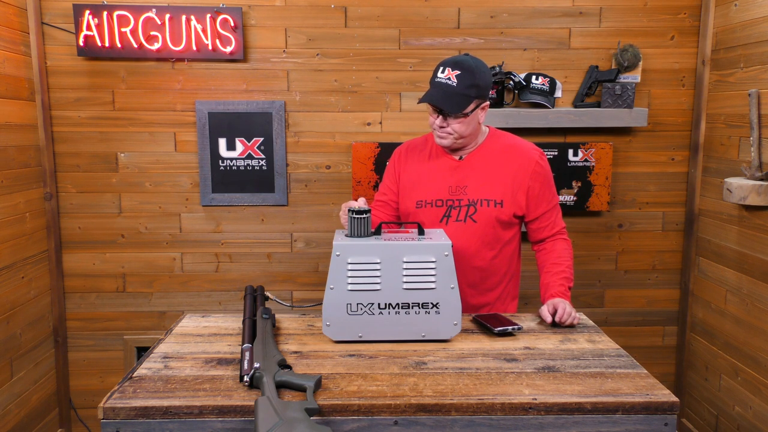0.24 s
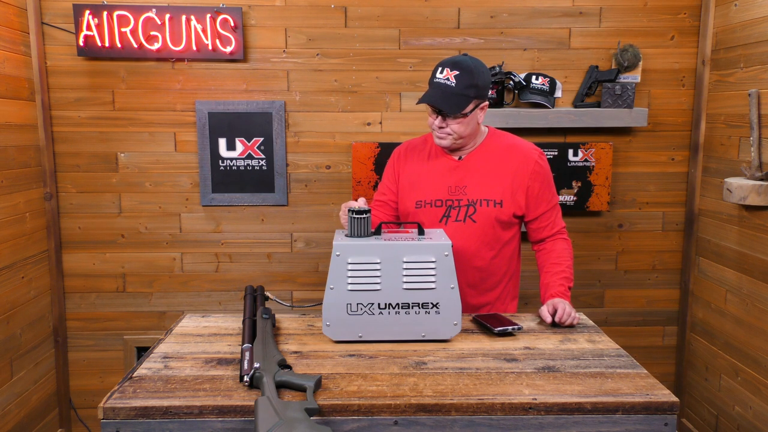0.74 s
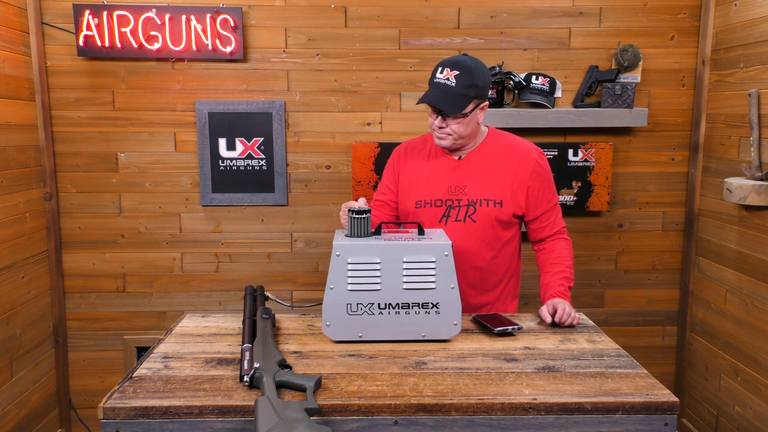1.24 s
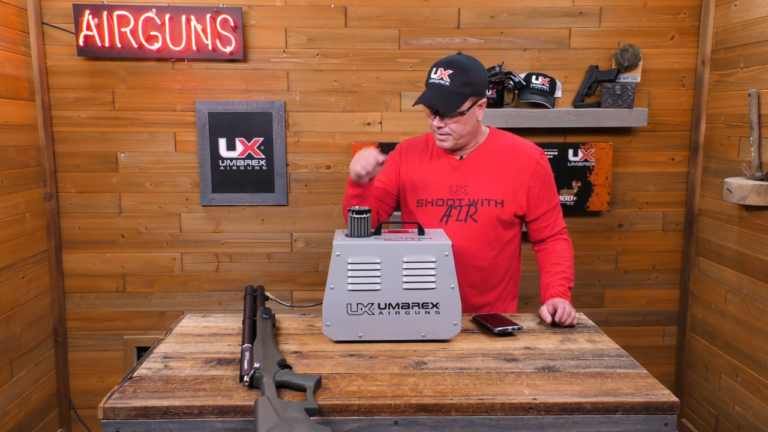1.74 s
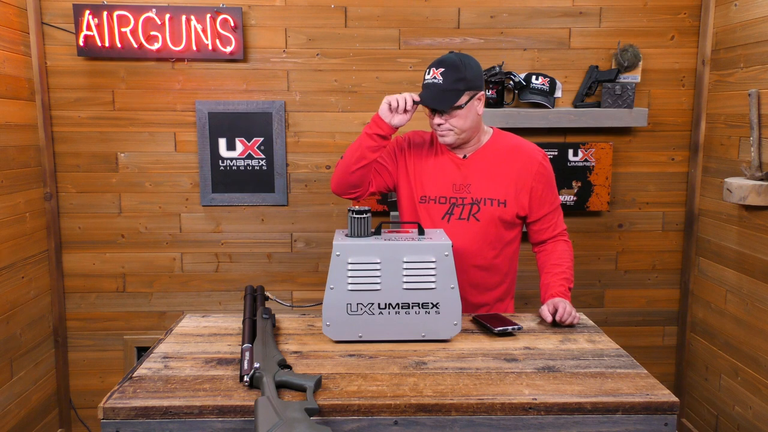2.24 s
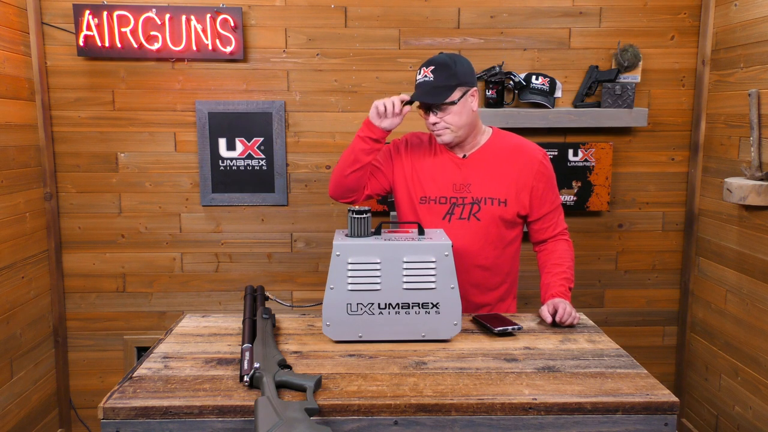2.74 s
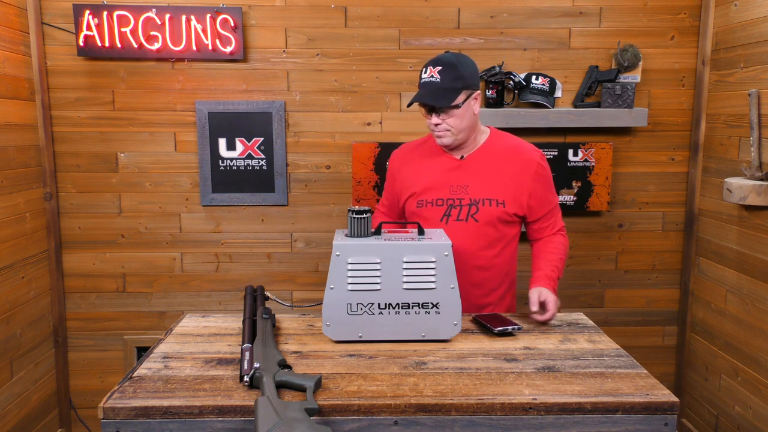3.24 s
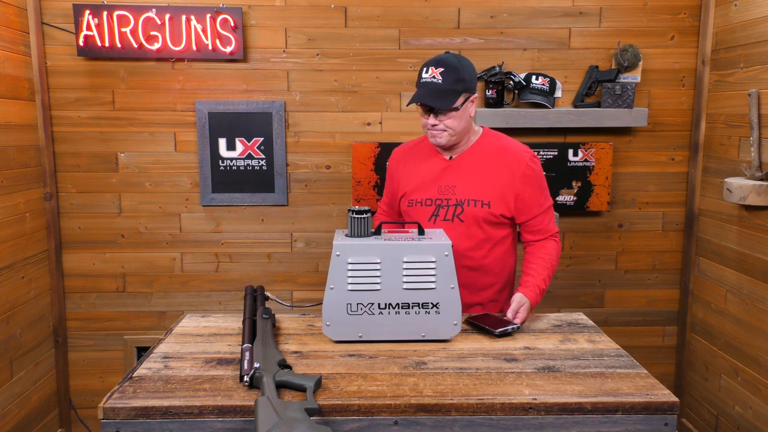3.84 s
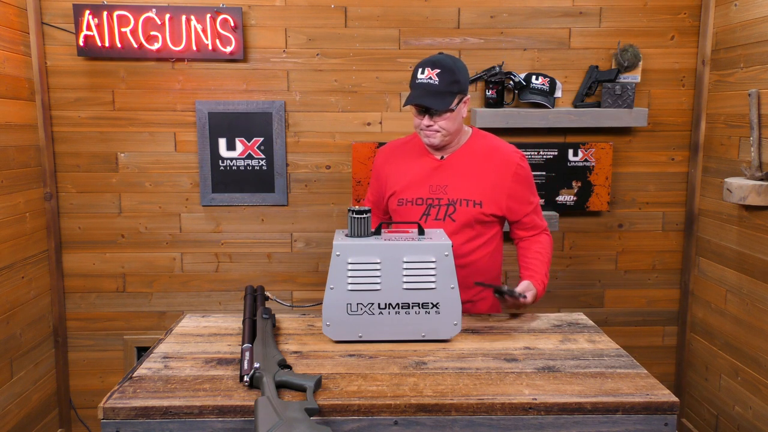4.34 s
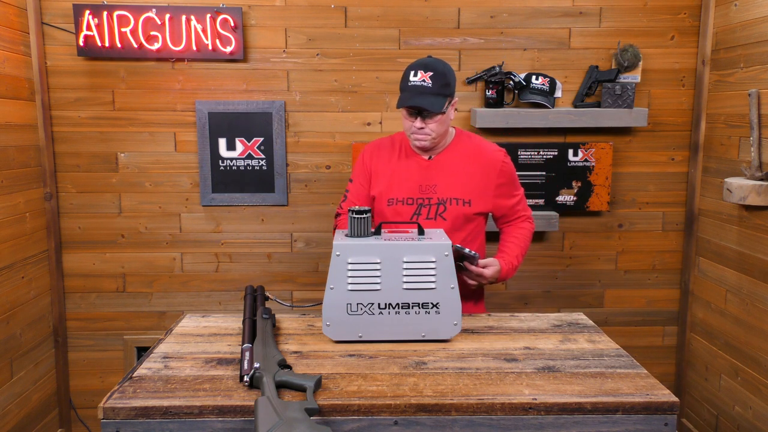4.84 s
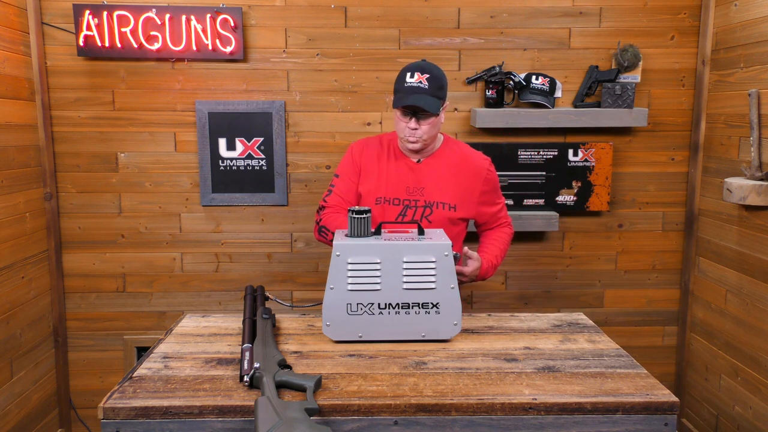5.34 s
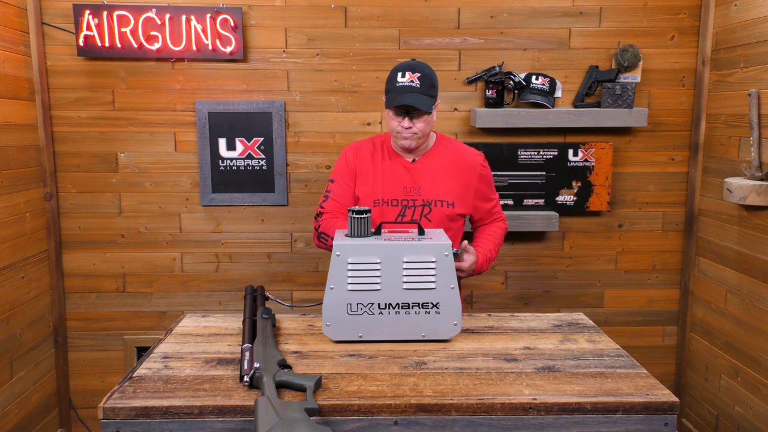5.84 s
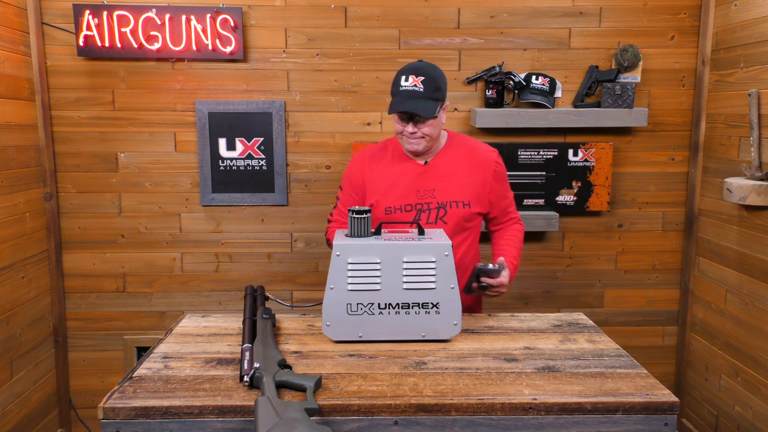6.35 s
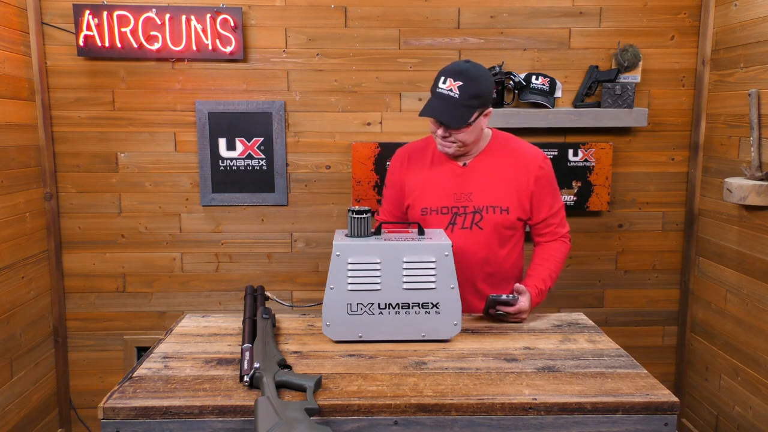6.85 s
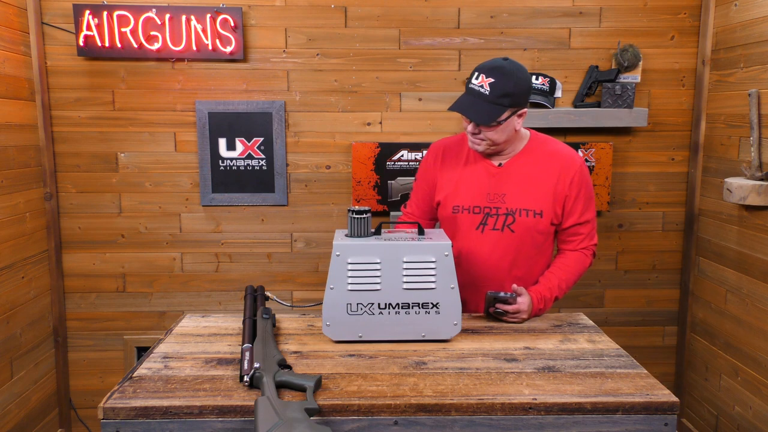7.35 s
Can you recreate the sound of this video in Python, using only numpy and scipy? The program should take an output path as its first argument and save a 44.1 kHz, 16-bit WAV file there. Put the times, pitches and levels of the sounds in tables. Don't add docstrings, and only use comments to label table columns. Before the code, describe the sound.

A small air compressor in a sheet-metal case is already running on a wooden table in a small room. Its nasal gear whine throbs nearly eight times a second, each stroke carrying a rattle, a boxy panel knock and hissy metallic chatter. It slows very slightly and grows a little harsher as pressure builds. Faint cooling air sits underneath. The microphone is near and dry, with a little room reflection.

```python
import sys
import numpy as np
from scipy import signal
from scipy.fft import rfft, irfft, next_fast_len
from scipy.io import wavfile
from scipy.ndimage import map_coordinates

SR = 44100
rng = np.random.default_rng(int(sys.argv[2]) if len(sys.argv) > 2 else 0)


def dump_mix(stems):
    frames = np.atleast_2d(stems).T
    limited = np.clip(frames, -1, 1)
    pcm = np.round(limited * 32767).astype(np.int16)
    wavfile.write(sys.argv[1], SR, pcm)


def nominal_scale(level):
    x = np.asarray(level, float) / 20
    return 10 ** x


N = 334719

START_TURN, START_SPEED, SLOWING, EASING = -0.78399, 7.739856, 0.05108927, 0.004117527
FULL_LOAD = 0.63

# [t/s, pressure/0 to 1]
TANK_PRESSURE = [(0, 0.29), (1.2, 0.27), (3.2, 0.54), (5, .8), (6.8, 1)]
# [t/s, presence/0 to 1]
PERSON_BEHIND = [(4.65, 0), (5.1, 0.33), (6.15, 0.67), (6.451, 0.32)]
# [t/s, presence/0 to 1]
PERSON_ASIDE = [(6.15, 0.09), (6.45, 0.87)]
# [t/s, presence/0 to 1]
ARM_OVER_CASE = [(1.6, 0), (2, 1), (2.9, 1), (3.4, 0.2)]
# [t/s, firmness/-1 to 1]
SEATING = [(0, 0.91), (.7, 0.75), (2.1, -0.52), (4.2, -0.08), (5.4, -0.17), (6.5, 0.87), (7.6, 1)]
# [t/s, level/dB]
WHINE_LEVEL = [(0, -2), (.7, -.5), (1.4, -0.5), (2.1, 0.85), (2.8, 0.5), (3.5, .5), (4.3, 1.3), (5, 0.5),
               (5.6, 0), (6.1, 1.5), (6.6, 1), (7, .5), (7.6, -1.5)]

TEETH = [(0, 86.7), (.07, 87.2), (.2, 87.7), (.33, 87.7), (.48, 87.3), (.65, 87.9), (.79, 90), (.885, 88.8),
         (.94, 87.3)]
PITCH_DRAG = [(.03, -1.4), (.15, 0), (.25, .3), (.4, -.7), (.56, -1.4), (.68, 0), (.8, .2), (.89, -0.099),
              (.98, -1.8)]
# [angle/turn, hold/turn, rise/dB per turn, sag/dB per turn, fall/dB per turn]
PHASES_EMPTY = [
    (0.47, 0.11, 140, 5, 146),
    (0.19, 0.29, 160, 39.4, 300),
    (0.86, 0.035, 65, 1, 300),
    (0.936, 0.0475, 210, 28, 350),
    (0.059, 0.032, 130, 1, 250),
]
PHASES_FULL = [
    (0.59, 0.11, 390, 5, 150),
    (0.22, 0.24, 290, 9.9, 220),
    (0.826, 0.058, 125, 1, 440),
    (0.935, 0.044, 170, 32, 180),
    (0.093, 0.016, 630, 1, 360),
]
# [coast/dB, intake/dB, squeeze/dB, top/dB, reversal/dB]
MESH_EMPTY = [(-49, -32, -38, -39, -25), (-37, -18, -24.5, -14, -33), (-46, -28, -39, -30.5, -42),
              (-52, -35.5, -63, -32, -41)]
MESH_LOADED = [(-35.5, -29, -36.5, -33.5, -34), (-41, -17.5, -21.5, -16.5, -24),
               (-44.5, -31.5, -31, -36, -41), (-55.5, -39.5, -58, -41, -44)]
# [intake/dB, squeeze/dB, top/dB]
MESH_BEHIND = [(-1.5, -17, 4), (-15.5, -15, -6.5), (5.5, 9, 10), (-8, 4, -6)]
MESH_ASIDE = [(-12, -11, -5.5), (4, 2, 2.5), (-5, 1.5, -2), (-1, 9.5, -8)]
INTAKE_LAG = [(0.11, 0.52), (0, 1), (0.063, 0.87), (0.11, 0.41)]
ORDER_TRIM = [-1.94, 0.3, -2.4, -0.64]
# [order, intake/dB, squeeze/dB at low pressure, intake/dB, squeeze/dB at high pressure]
UPPER_ORDERS = [(5, -54.5, -55.5, -55.5, -52.5), (6, -59, -65, -61, -55), (7, -67.5, -56.5, -67, -67.5),
                (8, -68, -65, -61.5, -67), (9, -70, -66, -63, -59), (10, -65, -62, -65, -62),
                (11, -91, -78, -66, -68), (12, -68, -65, -74, -86), (13, -64, -72, -61, -68),
                (14, -55.5, -64, -66, -74), (15, -61, -56, -69, -79), (16, -58, -58.5, -70, -62),
                (17, -69, -56.5, -76.0, -63), (18, -58, -64.0, -63, -73), (19, -82, -71.0, -73.0, -68)]
SQUEEZING = [(.05, 1), (.15, 0), (.55, 0), (.65, 1)]

# [angle/turn, level/dB, hold/turn, rise/dB per turn, fall/dB per turn]
MID_CHATTER = [(.12, -49, 0.33, 27, 45), (.96, -47, 0.017, 76, 100)]
HIGH_CHATTER = [(.2, -46.5, 0.057, 79, 30), (.77, -45.5, 0.0072, 90, 50.6), (.97, -49, 0.087, 40.2, 70)]
BOOM_BURSTS = [(0.15, -30, 0.011, 280, 310), (0.276, -26.5, 0.022, 180, 114), (0.016, -32, .02, 300, 330),
               (0.51, -23, 0.018, 110, 140)]
RATTLE_BURSTS = [
    (0.018, -30.5, 0.056, 530, 49.5),
    (.62, -47, 0.021, 59, 65),
]
# [f/Hz, level/dB per Hz]
CHATTER_COLOUR = [(2400, -4), (3000, -10), (4500, -13.5), (6200, -9.5), (7700, -12.5), (10500, -9),
                  (12500, -15), (15600, -37)]
# [f/Hz, width/Hz, level/dB]
LARGEST_PANEL = [(406.8, 28.8, 2), (388.8, 48.4, -4.5)]
# [f/Hz, width/Hz, level/dB]
CASE_PANELS = [(458.4, 31.5, -3.5), (548.6, 16, -7.5), (659, 69, -4), (996, 93, -6), (1042, 69, -2),
               (1257, 45, -0.5), (1444, 63, -12), (1838, 119, -6.5), (2094, 143, -10), (2356, 50, -17),
               (3100, 180, -38.5)]
# [f/Hz, width/Hz, level/dB]
DRIFTING_PANELS = [(355.7, 13.8, -12), (792, 20.7, 0.5), (1552, 52, -0.5)]
# [per seating/dB, under the arm/dB, person behind/dB, person aside/dB]
PANEL_SHIFT = [(8.5, 1.5, 4.5, 2), (-6, -4.5, -1, 2), (0, -9.5, 6.5, -4)]
# [angle/turn, level on case/dB, level on largest panel/dB]
BLOWS = [(.005, 3, -4.5), (.05, -25, -3), (0.1, -18, -8.5), (0.27, -18, 2), (0.473, -8, -3),
         (0.681, -23, -5)]

# [order of crank, level/dB]
SHAFT_TONES = [(88 / 9, -63), (15, -66), (88 / 3, -70)]
# [f/Hz, level/dB per Hz]
FAN_COLOUR = [(20, 0.5), (60, -6), (130, -14), (200, -6.5), (280, -10.5), (500, -6.5), (1500, -5.5),
              (4000, -17.5), (9000, -25.5), (15000, -53)]
# [f/Hz, t/s]
ROOM_DECAY = [(200, 0.33), (2000, 0.96), (10000, 0.043)]


def unit(x):
    return x / np.sqrt(np.mean(x ** 2) + 1e-20)


def along(points, hz):
    f, v = np.transpose(points)
    return np.interp(np.log(hz + 1), np.log(f + 1), v)


def curve(rows):
    seconds, values = np.transpose(rows)
    return np.interp(np.arange(N) / SR, seconds, values)


def per_stroke(rows, turns):
    share, values = np.transpose(rows)
    return np.interp(turns, share, values, period=1)


def filtered(x, response):
    m = next_fast_len(N + SR // 2)
    return irfft(rfft(x, m) * response(np.fft.rfftfreq(m, 1 / SR)), m)[..., :N]


def resonances(modes):
    def response(f):
        total = 0
        for k, (centre, width, db) in enumerate(modes):
            damping = 1j * f * width
            total = total + (-1) ** k * nominal_scale(db) * damping / (centre ** 2 - f ** 2 + damping)
        return total
    return response


def worn(turns, count, renew, order):
    slow = (turns - turns[0]) / renew
    pattern = rng.standard_normal((int(slow[-1]) + 2, count + 4))
    row, mix = slow.astype(int), slow % 1 * np.pi / 2
    place = turns % 1 * count + 1
    now = map_coordinates(pattern, [row, place], order=order)
    later = map_coordinates(pattern, [row + 1, place], order=order)
    return np.cos(mix) * now + np.sin(mix) * later


def impacts(turns, fresh, spiky_db):
    size = nominal_scale(spiky_db * worn(turns, count=90, renew=18.5, order=1))
    same = worn(turns, count=5600, renew=10.18, order=0) * size
    return np.sqrt(1 - fresh) * unit(same) + np.sqrt(fresh) * rng.standard_normal(N)


def swell(turns, share, hold, rise_db, sag_db, fall_db):
    x = (turns - share + .5) % 1 - .5
    attack = -abs(rise_db) * np.maximum(-x, 0)
    sag = -abs(sag_db) * np.maximum(x, 0)
    return attack + sag - abs(fall_db) * np.maximum(x - hold, 0)


def stacked(idle_db, swells_db):
    return 10 * np.log10(nominal_scale(2 * idle_db) + sum(nominal_scale(2 * db) for db in swells_db))


def bursts(turns, rows, idle_db):
    flares = [db + swell(turns, share, hold, rise, 0, fall) for share, db, hold, rise, fall in rows]
    return stacked(idle_db, flares)


def crank_turns():
    t = np.arange(N) / SR
    return START_TURN + START_SPEED * t - SLOWING * t ** 2 / 2 + EASING * t ** 3 / 6


def tooth_load(turns):
    pressure, behind, aside = curve(TANK_PRESSURE), curve(PERSON_BEHIND), curve(PERSON_ASIDE)
    load = np.clip(pressure / FULL_LOAD, 0, 1)
    shapes = [[a + pressure * (b - a) for a, b in zip(*pair)] for pair in zip(PHASES_EMPTY, PHASES_FULL)]
    coast, intake, *compression = [swell(turns, *shape) for shape in shapes]
    share, hold, *slopes = shapes[1]
    orders_db = []
    for empty, loaded, back, side, (lag, steep) in zip(MESH_EMPTY, MESH_LOADED, MESH_BEHIND, MESH_ASIDE, INTAKE_LAG):
        peak_db = [a + load * (b - a) for a, b in zip(empty, loaded)]
        person_db = [0, *(behind * a + aside * b for a, b in zip(back, side)), 0]
        late_intake = swell(turns, share + lag, hold - lag * 1.32, *(steep * s for s in slopes))
        phases = [coast, late_intake, *compression]
        swells = [p + q + r for p, q, r in zip(peak_db, person_db, phases)]
        orders_db.append(stacked(peak_db[0] - 24, swells))
    engaged_db = 0.57 * stacked(-19, [intake, *compression[:2]])
    return orders_db, engaged_db


def mesh_phase(turns):
    teeth = per_stroke(TEETH, turns) + 0.15
    return 2 * np.pi * np.cumsum(teeth * np.gradient(turns)) + 0.066 * worn(turns, count=30, renew=5.53, order=3)


def gear_whine(turns, mesh, orders_db, level_db):
    drag = 2 * np.pi * np.cumsum((per_stroke(PITCH_DRAG, turns) + .3) * np.gradient(turns))
    whine = 0
    for order, (db, trim) in enumerate(zip(orders_db, ORDER_TRIM), start=1):
        second = order == 2
        follow_db = level_db if second else 0.39 * level_db
        uneven_db = 0.27 * worn(turns, count=40, renew=6.0, order=1)
        tone = np.sqrt(2) * np.sin(order * (mesh + drag * second))
        whine = whine + nominal_scale(db + trim + follow_db + uneven_db) * tone
    return whine


def upper_whine(mesh, turns, mid_db, high_db):
    squeezing, pressure = per_stroke(SQUEEZING, turns), curve(TANK_PRESSURE)
    total = 0
    for order, low_in, low_sq, high_in, high_sq in UPPER_ORDERS:
        intake_db = low_in + pressure * (high_in - low_in)
        squeeze_db = low_sq + pressure * (high_sq - low_sq)
        load_db = 0.78 * (52 + mid_db) if order < 12 else 1.15 * (50.0 + high_db)
        flare_db = 4.55 * worn(turns, count=12, renew=5.71, order=1)
        level = nominal_scale(intake_db + squeezing * (squeeze_db - intake_db) + load_db + flare_db)
        total = total + level * np.sqrt(2) * np.sin(order * mesh + rng.uniform(0, 2 * np.pi))
    return total


def chatter(turns, mid_db, high_db):
    def colour(hz):
        return nominal_scale(along(CHATTER_COLOUR, hz)) * (hz > 2300)

    def below(hz, edge, steep):
        return 1 / (1 + (hz / edge) ** steep)

    def above(hz, edge, steep):
        return 1 / (1 + (edge / (hz + 1)) ** steep)

    mid = nominal_scale(mid_db) * impacts(turns, fresh=.35, spiky_db=4)
    mid = filtered(mid, lambda hz: colour(hz) * below(hz, 7500, 8))
    high = nominal_scale(1.13 * (high_db + 50) - 49.0) * impacts(turns, fresh=0.25, spiky_db=0.5)
    high = filtered(high, lambda hz: colour(hz) * above(hz, 7500, 8) * below(hz, 12300, 12))
    top = nominal_scale(2.5 * (high_db + 49) - 50.5) * impacts(turns, fresh=.45, spiky_db=4)
    top = filtered(top, lambda hz: colour(hz) * above(hz, 12300, 12))
    return nominal_scale(16.5) * mid + nominal_scale(14) * high + nominal_scale(17.5) * top


def shaft_hum(turns):
    return sum(nominal_scale(db) * np.sqrt(2) * np.sin(2 * np.pi * order * turns) for order, db in SHAFT_TONES)


def blows(turns, column):
    x = np.zeros(N)
    for share, *db in BLOWS:
        at = np.flatnonzero(np.diff(np.floor(turns - share)) > 0)
        x[at] += nominal_scale(db[column] + 0.7 * rng.standard_normal(len(at)))
    return x


def panel_boom(turns, knock_db):
    burst_db = bursts(turns, BOOM_BURSTS, idle_db=-39)
    thump = nominal_scale(burst_db + 11) * impacts(turns, fresh=0.017, spiky_db=-1.0) + nominal_scale(18.0) * blows(turns, column=1)
    return nominal_scale(knock_db + 5.1 * curve(PERSON_BEHIND)) * filtered(thump, resonances(LARGEST_PANEL))


def panel_drift():
    controls = [curve(rows) for rows in (SEATING, ARM_OVER_CASE, PERSON_BEHIND, PERSON_ASIDE)]
    return [sum(db * c for db, c in zip(row, controls)) for row in PANEL_SHIFT]


def case_rattle(turns, knock_db):
    reversal_db, valve_db = (bursts(turns, [row], idle_db=-55.5) for row in RATTLE_BURSTS)
    rattle_db = stacked(reversal_db, [valve_db + 8.5 * curve(TANK_PRESSURE)])
    rattle_db = rattle_db + 2.5 * curve(PERSON_BEHIND) - 2.5 * curve(PERSON_ASIDE)
    knocks = nominal_scale(rattle_db + 22.5) * impacts(turns, fresh=0.085, spiky_db=0.26)
    shake = nominal_scale(knock_db) * (knocks + nominal_scale(12) * blows(turns, column=0))
    rattle = filtered(shake, resonances(CASE_PANELS))
    for db, mode in zip(panel_drift(), DRIFTING_PANELS):
        rattle += nominal_scale(db) * filtered(shake, resonances([mode]))
    return rattle


def radiated(x):
    return filtered(x, lambda hz: (1j * hz / (1j * hz + 325 / 0.96 + 325 ** 2 / (1j * hz + 1))) ** 2)


def compressor():
    turns, level_db = crank_turns(), curve(WHINE_LEVEL)
    knock_db, chatter_db = 0.39 * level_db, 0.22 * level_db
    mid_db = bursts(turns, MID_CHATTER, idle_db=-80) + 2 * curve(TANK_PRESSURE)
    high_db = bursts(turns, HIGH_CHATTER, idle_db=-61.5)
    orders_db, engaged_db = tooth_load(turns)
    mesh = mesh_phase(turns)
    whine = gear_whine(turns, mesh, orders_db, level_db)
    upper = nominal_scale(engaged_db + 2.5) * upper_whine(mesh, turns, mid_db, high_db)
    fine = nominal_scale(chatter_db) * (upper + chatter(turns, mid_db, high_db))
    case = radiated(panel_boom(turns, knock_db) + case_rattle(turns, knock_db))
    return whine + fine + shaft_hum(turns) + case


def fan():
    return nominal_scale(-49.0) * unit(filtered(rng.standard_normal(N), lambda hz: nominal_scale(along(FAN_COLOUR, hz))))


def room(x):
    hz, t, z = signal.stft(rng.standard_normal(SR // 2), SR, nperseg=256)
    fade = nominal_scale(-60 * t / along(ROOM_DECAY, hz)[:, None])
    tail = signal.istft(z * fade, SR, nperseg=256)[1]
    delayed = np.pad(x, (400, 0))
    return signal.fftconvolve(delayed, tail / np.linalg.norm(tail))[:N]


def scene():
    machine = compressor()
    return (machine + nominal_scale(-22.5) * room(machine) + fan())[None]


def low_pass(x):
    return signal.sosfilt(signal.butter(12, 15710, fs=SR, output="sos"), x)


def record(dry):
    bend = dry ** 2 - np.mean(dry ** 2)
    throb = filtered(bend, lambda hz: 1j * hz / (15 + 1j * hz) / (1 + (hz / 42) ** 4))
    return low_pass(dry + nominal_scale(-8.5) * throb)


dry = scene()
out = record(dry)
dump_mix(out)
```